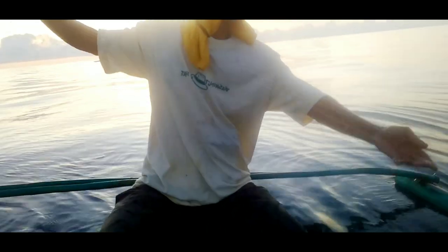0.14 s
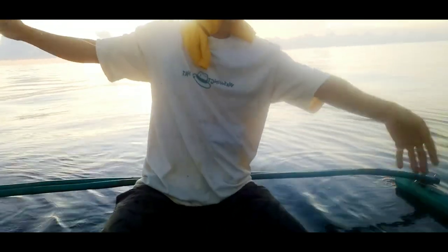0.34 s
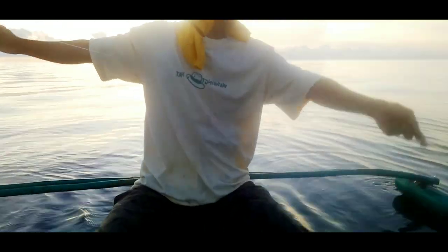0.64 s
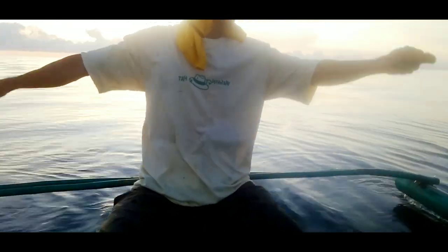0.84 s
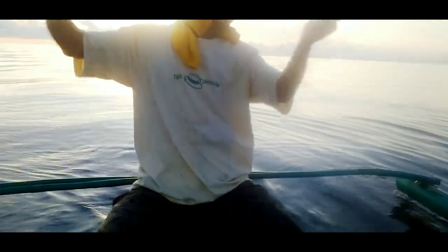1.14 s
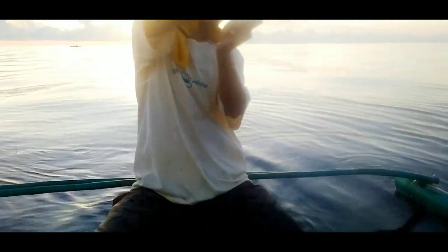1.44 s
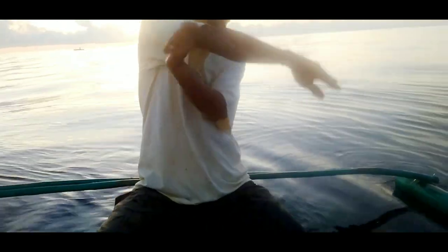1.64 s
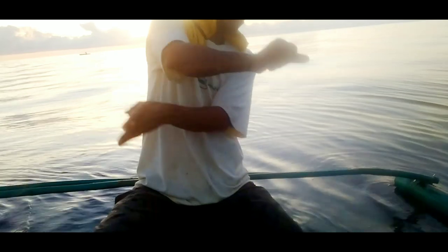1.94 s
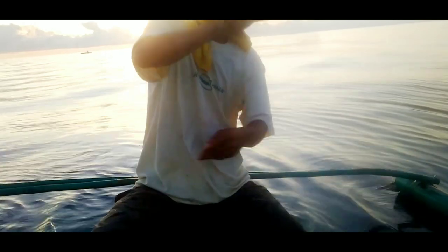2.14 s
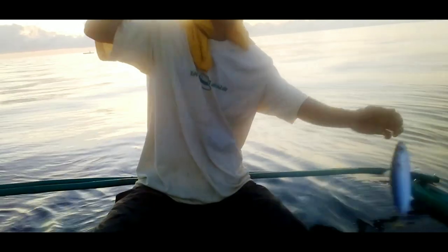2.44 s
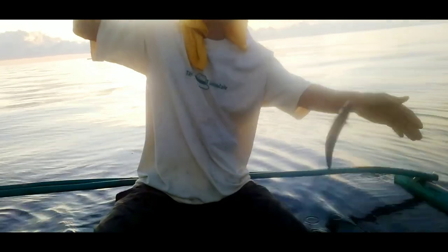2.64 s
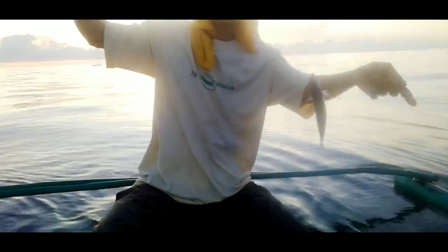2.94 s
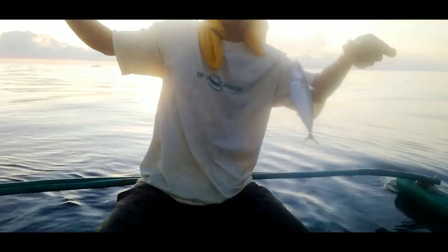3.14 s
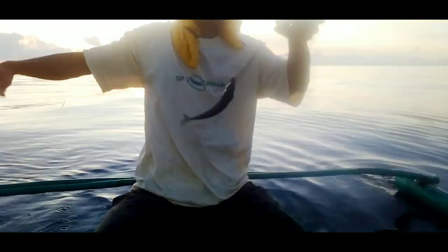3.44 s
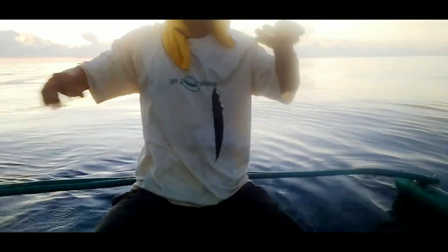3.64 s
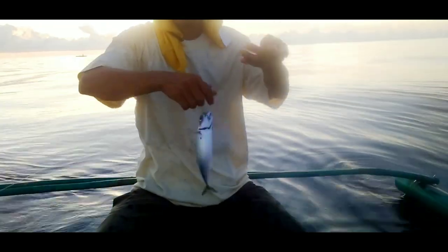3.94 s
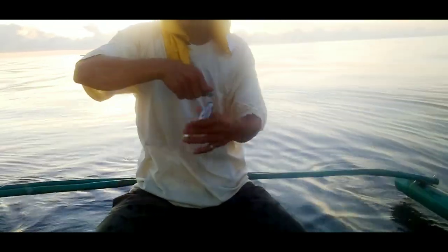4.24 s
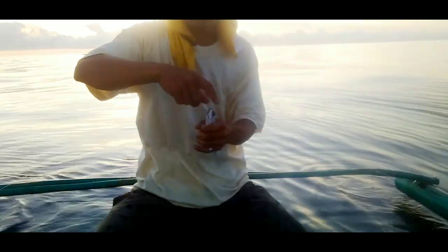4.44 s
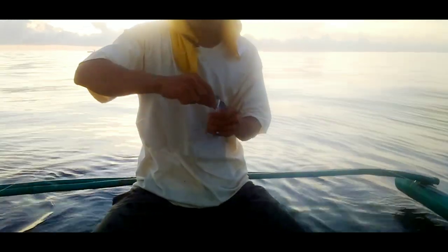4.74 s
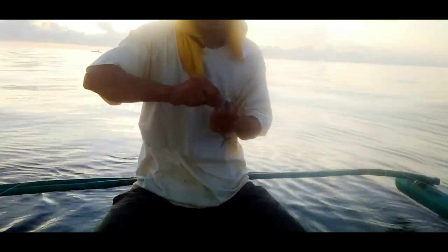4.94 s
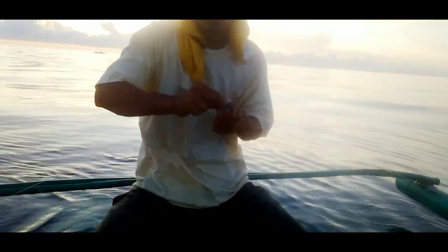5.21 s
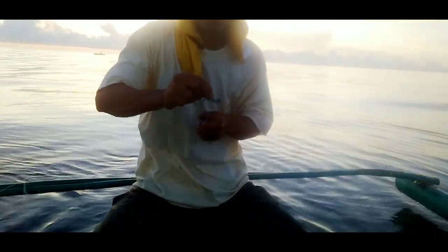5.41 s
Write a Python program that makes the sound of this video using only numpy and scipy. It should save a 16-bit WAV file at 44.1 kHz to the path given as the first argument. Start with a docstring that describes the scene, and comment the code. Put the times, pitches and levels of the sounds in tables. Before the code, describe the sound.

Outdoors on calm water, a phone lies close to a small wooden boat's side while a wet line is hauled in by hand. From 0 to 0.6 s, spray and trickle mix with short hollow knocks, strongest near 0.3 s with a crisp drop snap. After a brief dip, spray hisses at 0.8 s, low wavelets slosh, and ticks and snaps follow at 1.2 to 1.4 s. A solid knock and bright snap hit at 1.6 s, then scattered ticks and a small drip. Water thins around 2.0 to 2.3 s, with knocks at 2.3, 2.7 and 2.9 s. The sharpest snap cracks at 3.16 s, then rapid knocks and deep slosh around 3.4 s. From 3.7 s it is nearly silent, with faint drips and abruptly gated pauses. Light bumps come at 4.4 to 4.7 s; a loud knock, snap and splash at 5.1 s fade in droplets.

```python
"""A small wooden boat on calm water: a wet hand line comes in over the side, close to a phone microphone.
Line and gear knock on the hull, exciting its damped modes; filtered noise and bubbles trickle and spray.
Drops snap, tick and plop as short excited resonances; wavelets slosh under the planks as swelling low noise.
A noise gate, closed at listed times, cuts water and knocks sharply down in the pauses, over faint bands,
rumble and hush."""
import sys
import numpy as np
from scipy import signal
from scipy.io import wavfile
from scipy.ndimage import uniform_filter1d

SR = 44100
rng = np.random.default_rng(int(sys.argv[2]) if len(sys.argv) > 2 else 0)


def master_out(mix):
    """Clip the mix to full scale and print it as 16-bit PCM to the path in sys.argv[1]."""
    frames = np.transpose(np.atleast_2d(mix))
    ceiling = np.clip(frames, -1, 1)
    pcm = np.round(ceiling * 32767).astype(np.int16)
    wavfile.write(sys.argv[1], SR, pcm)


N = 245637  # length [samples]

# knocks of line and gear on the hull: t/s, peak level before the gate/dB, centre of the struck modes f/Hz
HULL_KNOCKS = [(0.028, -22.5, 367), (0.12, -28.5, 337), (0.206, -25, 348), (0.308, -24, 614),
               (0.318, -17.5, 390), (0.46, -25.5, 277), (0.549, -23.5, 273), (0.98, -25, 766),
               (1.012, -24, 314), (1.383, -31.5, 315), (1.588, -13, 404), (1.689, -26, 95),
               (1.943, -29.5, 1580), (2.344, -17, 302), (2.443, -33.5, 294), (2.521, -27, 530),
               (2.688, -20.5, 250), (2.898, -16, 316), (3.01, -31, 353), (3.058, -40, 320),
               (3.129, -23, 1620), (3.145, -26, 765), (3.247, -24, 333), (3.353, -17.5, 765),
               (3.384, -26, 230), (3.422, -16, 706), (3.55, -23, 670), (3.941, -32.5, 95),
               (4.394, -27.5, 105.6), (4.571, -28, 660), (4.671, -23.5, 422), (4.719, -36, 292),
               (4.884, -56.5, 498), (5.048, -26, 300), (5.125, -12.5, 610), (5.254, -30, 690),
               (5.31, -31, 700)]
# spectrum of spray and fine droplets: f/Hz, relative level/dB
SPRAY_SPECTRUM = [(1180, -22), (2000, -10), (3060, -7.5), (4650, -6), (7700, 2.5), (10900, -8),
                  (15100, -13.5), (15600, -17.5), (16000, -40.5)]
# spectrum of water moving under the hull, also of the rumble: f/Hz, relative level/dB
SLOSH_SPECTRUM = [(15, -45), (25, -11), (60, 2.5), (86, 8.5), (162, 2.5), (254, -11), (303, -16),
                  (500, -37.5), (650, -39.5), (1100, -120)]


def water():
    """Filtered noise with resonant bubbles makes the trickle; puffs of noise with fine clicks make the spray."""
    # water running off the line: t/s, trickle level before the gate/dB, spray level before the gate/dB
    runoff = [(0, -51.5, -42.5), (.3, -42, -51.5), (.62, -47.5, -51), (.78, -52, -52), (1.0, -41, -48.5),
              (1.12, -42, -53), (1.219, -58.5, -42), (1.481, -45, -44.5), (1.8, -79, -53), (1.95, -51, -50),
              (2.17, -62.5, -83), (2.4, -57.5, -54.5), (2.65, -53, -62), (2.85, -67.5, -72),
              (3.06, -59, -73), (3.14, -45.5, -60.5), (3.301, -55.5, -46.5), (3.6, -50.5, -58.5),
              (3.721, -55, -63), (3.959, -86.5, -94.5), (4.42, -66.5, -67.5), (4.799, -72, -70.5),
              (4.891, -60, -71.5), (5.02, -74.5, -61.5), (5.08, -47, -47.5), (5.461, -61.5, -59)]
    # spurts of spray flung off the line: start t/s, length t/s, starting level before the gate/dB
    spurts = [(.12, 0.18, -38.5), (.34, 0.076, -38.5), (.55, 0.043, -36.5), (.78, 0.16, -34),
              (1.92, 0.21, -44.5), (2.155, 0.11, -46.5), (2.576, 0.023, -31), (3.35, 0.044, -35),
              (3.498, 0.015, -30), (3.525, 0.011, -30.5), (4.062, 0.11, -52.5), (4.57, 0.11, -48),
              (5.04, 0.022, -35.5), (5.12, 0.18, -43.5)]
    # spectrum of the trickle: f/Hz, relative level/dB
    trickle_spectrum = [(150, -52.5), (250, -11), (425, 2), (512, -2.5), (852, -3.5), (1030, -7.5),
                        (1280, -5.5), (3500, -19.5), (4550, -71)]

    s, trickle_db, spray_db = np.transpose(runoff)
    # each knock stirs up a short wash of trickle, 36.5 dB below the knock's peak
    washes = [(start, 0.0043, db - 36.5) for start, db, _ in HULL_KNOCKS]
    trickle_power = curve(s, trickle_db) + swells(washes, rise_s=0.01, sag_db=0, fall_db_per_s=135.5)
    spray_power = curve(s, spray_db) + swells(spurts, rise_s=0.01, sag_db=-9, fall_db_per_s=237)

    flow = evened(patchy(lumpy(50, 3.5), 3.5))
    bubbles = sum(ring(grains(13, 4.3), hz, hz / 14) for hz in np.geomspace(350, 2400, num=14))
    trickle = coloured(flow + gain_of(-13) * evened(bubbles), trickle_spectrum)

    fizz = evened(lumpy(90, 3.5))
    crackle = sum(ring_twice(grains(60, 3.2), hz, hz / 7) for hz in np.geomspace(3000, 12000, num=8))
    spray = coloured(patchy(fizz + gain_of(-6.0) * evened(crackle), 2.6), SPRAY_SPECTRUM)
    return np.sqrt(trickle_power) * evened(trickle) + np.sqrt(spray_power) * evened(spray)


def knocks():
    """Modal excitation: a rough contact with a ragged end drives the damped hull modes near a centre pitch."""
    # hull modes: nominal f/Hz, nominal level/dB, decay by 60 dB t/s
    hull_modes = [(98, 7.5, 0.05), (192, -12, 0.21), (236, -7.5, 0.079), (303.6, -2, 0.07),
                  (369.3, 4, 0.035), (484, 1.5, 0.026), (541, -1, 0.024), (687, 5, 0.028),
                  (913, -6.5, 0.072), (1240, -6.5, 0.05), (1560, 10.5, 0.0082)]
    contact_s = 0.0028

    out, t = np.zeros(N), np.arange(9000) / SR
    u = t / contact_s
    contact_shape = np.minimum(0.59 * u, 1) * (np.exp(-1.5 * u) + 0.026 * np.exp(-t / 0.036))
    for s, db, centre_hz in HULL_KNOCKS:
        contact = rng.standard_normal(len(t)) * contact_shape
        body = np.zeros(len(t))
        for hz, mode_db, t60 in hull_modes:
            # random small detuning and level change of each mode, for variety from knock to knock
            detuning, level_change = rng.standard_normal(2)
            octaves = np.log2(hz / centre_hz)
            level_db = mode_db + 2 * level_change - 11.5 * octaves ** 2 - 60 * t / t60
            body += gain_of(level_db) * np.sin(2 * np.pi * hz * (1 + .025 * detuning) * t)
        soft = body * (1 - np.exp(-t * centre_hz * 0.8))  # a wet blow starts without a click
        driven = evened(signal.oaconvolve(contact, soft)[:len(t)])
        # the wet surface cracks, faintly in deep thuds
        slap_gain = gain_of(-13.5) * min(centre_hz / 350, 1) ** 2
        slap = slap_gain * evened(ring_twice(contact, 1300, 2200))
        add(out, s, evened(soft) + 0.69 * driven + slap, db)
    return out


def snaps():
    """Cavity resonance: a bursting drop gives a click with a fizzing tail, and its small cavity rings."""
    # snaps of bursting drops: t/s, peak level/dB, cavity pitch f/Hz, burst decay by 60 dB t/ms
    drop_snaps = [(0.1382, -26.5, 2480, 120), (0.31, -14, 3040, 66), (0.742, -24.5, 2060, 29),
                  (0.785, -18.5, 4770, 24), (0.877, -22, 4130, 90), (1.088, -21.5, 4170, 105),
                  (1.3625, -13, 1820, 12), (1.6183, -9, 1900, 19.4), (1.926, -20.5, 1710, 43),
                  (1.9786, -25, 2590, 22), (2.1596, -26.5, 4120, 59), (2.3477, -20, 3640, 24),
                  (2.561, -24.5, 1630, 20), (2.8999, -32, 3150, 150), (3.119, -18, 3340, 160),
                  (3.1619, -4.5, 3700, 27), (3.1692, -15, 2880, 36), (4.581, -31.5, 1720, 35),
                  (5.035, -24, 3200, 160), (5.1248, -9, 3210, 72), (5.2257, -20, 2890, 30),
                  (5.3095, -18, 3100, 59), (5.3212, -14, 2520, 49), (5.4098, -22.5, 2930, 29)]

    out, t = np.zeros(N), np.arange(3000) / SR
    rise = np.minimum(t / .002, 1) ** 2
    first_crack = 1 + 1.6 * np.exp(-((t - .002) / .0003) ** 2)  # stands out at the top of the rise
    for s, db, hz, t60_ms in drop_snaps:
        decay = gain_of(-60000 * np.maximum(t - .002, 0) / max(t60_ms, 2))
        burst = rng.standard_normal(len(t)) * decay * rise * first_crack
        crack = evened(coloured(patchy(burst, 3.0), SPRAY_SPECTRUM))
        cavity = evened(ring(burst, hz, hz / 12))
        add(out, s, crack + gain_of(-8.0) * cavity, db)
    return out


def ticks():
    """Impulsive excitation: a puff of a few milliseconds from a tiny droplet rings near one high pitch."""
    # ticks of tiny droplets: t/s, peak level/dB
    droplet_ticks = [(0.2303, -22.5), (0.252, -27), (0.3457, -33), (0.4103, -26), (0.445, -25.5),
                     (0.823, -30), (0.831, -22), (0.849, -27), (1.132, -26.5), (1.2066, -22.5),
                     (1.2316, -11.5), (1.2328, -21.5), (1.257, -42), (1.28, -29), (1.5382, -26),
                     (1.7163, -20), (1.8183, -18.5), (1.8476, -18.5), (1.8558, -21), (1.868, -27.5),
                     (1.8928, -32), (1.757, -29.5), (2.018, -36), (2.0706, -28), (2.154, -24),
                     (2.3952, -29), (2.431, -33), (2.493, -32.5), (2.603, -18), (2.629, -36), (2.6608, -30),
                     (2.856, -52), (3.134, -40), (3.28, -30.5), (3.437, -27.5), (3.571, -26.5),
                     (3.7903, -50.5), (4.0647, -42.5), (4.0965, -47), (4.7984, -41.5), (5.01, -36.5)]
    puff_s = 0.00094  # time from onset to the top of the puff's envelope

    out, t = np.zeros(N), np.arange(500) / SR
    for s, db in droplet_ticks:
        puff = rng.standard_normal(len(t)) * t / puff_s * np.exp(-t / puff_s)
        hz = 8600 * rng.uniform(.8, 1.15)
        add(out, s, coloured(ring_twice(puff, hz, 4000), SPRAY_SPECTRUM), db)
    return out


def drips():
    """Bubble resonance: a damped tone of steady pitch, with a lingering fuzzy band and faint splash."""
    # single drips: t/s, peak level/dB, bubble pitch f/Hz
    single_drips = [(1.391, -33, 2900), (1.143, -35, 1420), (1.773, -43, 2450), (1.832, -48.5, 1040),
                    (1.942, -29, 849), (2.755, -38, 2540), (2.833, -49, 2500), (2.87, -43, 1590),
                    (2.855, -46, 3150), (3.981, -47, 1650), (4.014, -54, 2650), (4.184, -55, 1800)]

    out, t = np.zeros(N), np.arange(9000) / SR
    rise = np.minimum(t / .002, 1)
    for s, db, hz in single_drips:
        tone = np.sin(2 * np.pi * hz * t) * rise * gain_of(-60 * t / .08)
        stir = rng.standard_normal(len(t)) * rise * gain_of(-60 * t / .16)
        fuzz = evened(ring_twice(stir, hz, hz / 10))
        splash = evened(ring_twice(stir, 1.3 * hz, hz / 2))
        add(out, s, evened(tone) + fuzz + .5 * splash, db)
    return out


def slosh():
    """Amplitude-modulated low noise: the power of each wavelet under the hull adds to a quiet lapping."""
    # quiet lapping between wavelets: t/s, level/dB
    lapping = [(0, -53.5), (.6, -71), (1.75, -55.5), (2.1, -51.5), (2.25, -73), (3.15, -66), (3.7, -63),
               (4.07, -69.5), (4.55, -70), (4.85, -86), (5.35, -65.5), (5.5, -83.5)]
    # wavelets sloshing under the hull: start t/s, length t/s, starting level/dB
    wavelets = [(.3, 0.34, -31), (.82, 0.33, -35), (.95, 0.41, -35.5), (1.37, 0.34, -34.5),
                (2.34, 0.17, -48.5), (2.69, 0.34, -33.5), (2.84, 0.24, -39.5), (3.19, 0.17, -35.5),
                (3.34, 0.335, -29), (4.36, 0.064, -43), (4.67, 0.12, -53), (5.04, 0.073, -31),
                (5.14, 0.15, -43)]

    wavelet_power = swells(wavelets, rise_s=0.071, sag_db=-11.5, fall_db_per_s=914)
    power = curve(*np.transpose(lapping)) + wavelet_power
    return np.sqrt(power) * evened(coloured(lumpy(25, 3.5), SLOSH_SPECTRUM))


def noise_gate():
    """Gating: a gain of 1 while open drops by 16 dB within milliseconds in the listed spans."""
    # spans in which the noise gate is closed over water and knocks: from t/s, to t/s
    closed_spans = [(.67, .745), (2.04, 2.15), (2.2, 2.34), (2.505, 2.52), (2.675, 2.69), (3.075, 3.115),
                    (3.72, 3.93), (4.07, 4.372), (4.46, 4.55), (4.6, 4.668), (4.765, 4.865), (4.93, 5.005),
                    (5.475, 5.6)]

    t = np.arange(N) / SR
    closed = sum(1. * (t >= start) * (t <= end) for start, end in closed_spans)
    return gain_of(-16 * uniform_filter1d(closed, size=200))


def background():
    """Narrow-band and coloured noise: faint wavering bands, rumble and hush."""
    # two faint wavering bands, present throughout and loudest from 1.9 to 4.05 s: f/Hz, bandwidth f/Hz, level
    # before the swell/dB
    faint_bands = [(880, 130, -76), (1550, 110, -79)]
    # swell of the two bands: t/s, gain/dB
    band_swell = [(1.6, -42), (1.9, -4.5), (4.052, -3.5), (4.15, -27)]

    bands = sum(gain_of(db) * evened(ring_twice(lumpy(22, 6.0), hz, width)) for hz, width, db in faint_bands)
    swell = gain_of(np.interp(np.arange(N) / SR, *np.transpose(band_swell)))
    rumble = evened(coloured(lumpy(5.1, 17.0), SLOSH_SPECTRUM))
    hush = evened(coloured(patchy(lumpy(8, 5.0), 6.0), SPRAY_SPECTRUM))
    return swell * bands + gain_of(-86.5) * rumble + gain_of(-82.5) * hush


def gain_of(db):
    """Logarithmic level: decibels to an amplitude factor."""
    return 10 ** (np.asarray(db) / 20)


def evened(x):
    """Normalisation: scales to rms 1."""
    return x / np.sqrt(np.mean(x ** 2) + 1e-20)


def add(mix, s, sound, db):
    """Superposition: adds a sound at a time with a peak level."""
    part = mix[round(s * SR):][:len(sound)]
    part += gain_of(db) * sound[:len(part)] / abs(sound).max()


def coloured(x, points):
    """Minimum-phase filtering: imposes a spectrum causally, so that clicks keep a sharp front."""
    f, db = np.transpose(points)
    hz = abs(np.fft.fftfreq(8192, 1 / SR))
    response_db = np.interp(np.log(hz + 1), np.log(f), db)
    log_gain = np.log(gain_of(np.maximum(response_db, -70)))
    # the Hilbert transform of the log gain gives the minimum phase
    taps = np.fft.ifft(np.exp(np.conj(signal.hilbert(log_gain)))).real[:4096]
    return signal.oaconvolve(x, taps)[:len(x)]


def ring(x, hz, width):
    """Damped resonance: a two-pole filter of gain 1 at its centre, width in Hz."""
    pole = np.exp((2j * np.pi * hz - np.pi * width) / SR)
    return 2 * signal.lfilter([1 - abs(pole)], [1, -pole], x).real


def ring_twice(x, hz, width):
    """Cascaded resonance: two equal stages give steeper skirts."""
    return ring(ring(x, hz, width), hz, width)


def lumpy(per_s, depth_db):
    """Random amplitude modulation: noise whose level wanders about per_s times a second."""
    wander = np.interp(np.arange(N) * per_s / SR, np.arange(N // 8), rng.standard_normal(N // 8))
    return rng.standard_normal(N) * gain_of(depth_db * wander)


def grains(per_s, spread_db):
    """Random impulse train: sparse clicks, most small and a few large."""
    size_db = spread_db * np.minimum(rng.exponential(1, N), 4)
    size = gain_of(size_db) * rng.choice([-1., 1.], N)
    return size * (rng.random(N) < per_s / SR)


def patchy(x, depth_db):
    """Time-frequency modulation: random patches of about 1.5 kHz by 20 ms, louder and softer."""
    z = signal.stft(x, nperseg=256, noverlap=192)[2]
    patches = rng.standard_normal(z.shape)
    for _ in range(2):
        patches = uniform_filter1d(patches, 9, axis=0)  # along frequency
        patches = uniform_filter1d(patches, 12, axis=1)  # along time
    return signal.istft(z * gain_of(depth_db * evened(patches)), nperseg=256, noverlap=192)[1][:len(x)]


def curve(s, db):
    """Level to power: a level curve interpolated in dB."""
    return gain_of(np.interp(np.arange(N) / SR, s, db)) ** 2


def swells(rows, rise_s, sag_db, fall_db_per_s):
    """Power summation of events that rise, sag while they last, then die away."""
    t, power = np.arange(N) / SR, np.zeros(N)
    for s, length, db in rows:
        u = (t - s)[round(s * SR):][:SR]
        shape_db = sag_db * np.minimum(u / length, 1) - fall_db_per_s * np.maximum(u - length, 0)
        power[round(s * SR):][:SR] += (np.clip(u / rise_s, 0, 1) * gain_of(db + shape_db)) ** 2
    return power


def scene():
    """Superposition of all sources at one microphone; the noise gate acts only on water and knocks."""
    gated = noise_gate() * (water() + knocks())
    return (gated + slosh() + snaps() + ticks() + drips() + background())[None]


def record(dry):
    """Band limitation: a small microphone loses the bass below 48 Hz; a low-pass ends the treble at 16.1 kHz."""
    bass_cut = signal.butter(3, 48, "high", fs=SR, output="sos")
    treble_cut = signal.firwin(101, 16100, window=("kaiser", 7), fs=SR)
    return signal.oaconvolve(signal.sosfilt(bass_cut, dry), treble_cut[None], "same")


dry = scene()
out = record(dry)
master_out(out)
```